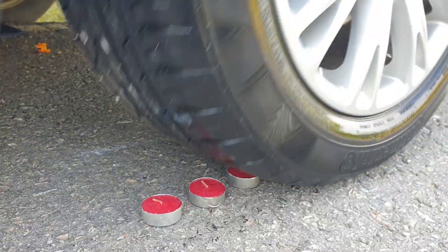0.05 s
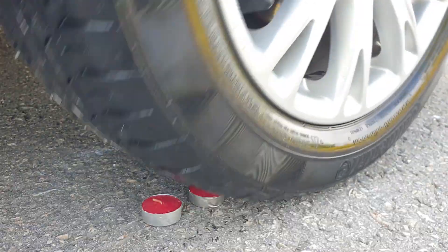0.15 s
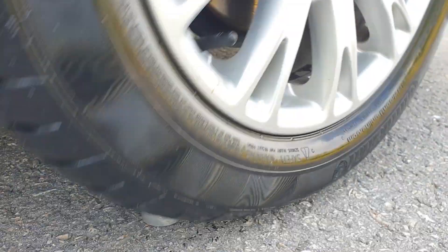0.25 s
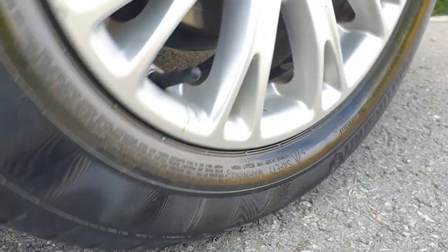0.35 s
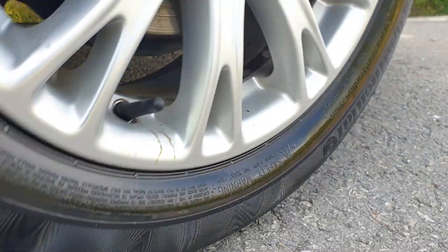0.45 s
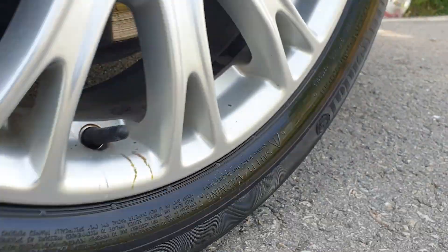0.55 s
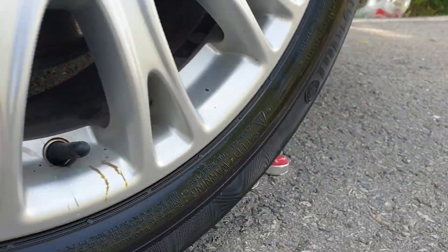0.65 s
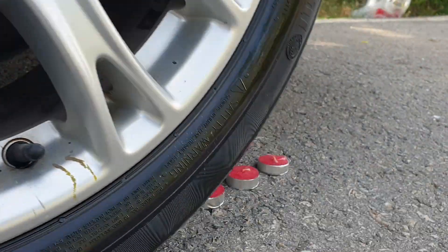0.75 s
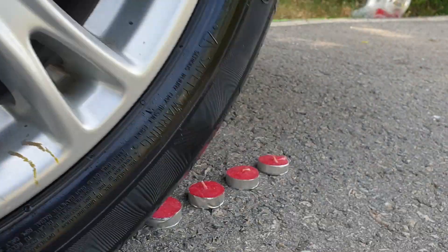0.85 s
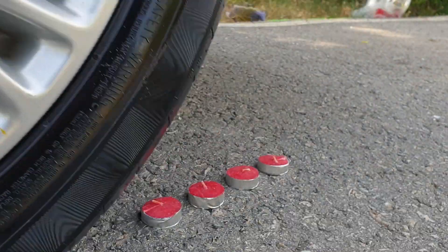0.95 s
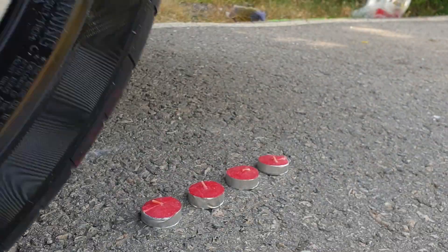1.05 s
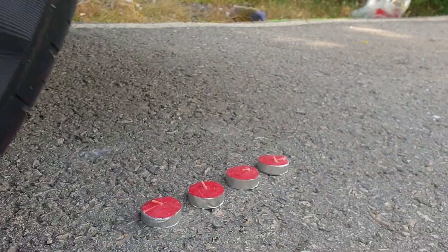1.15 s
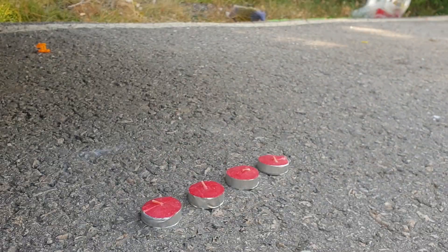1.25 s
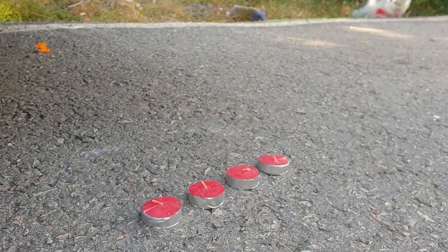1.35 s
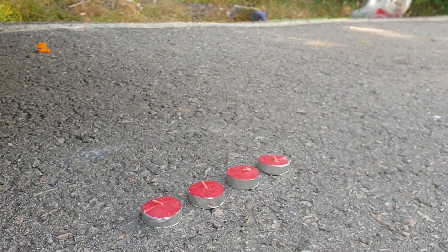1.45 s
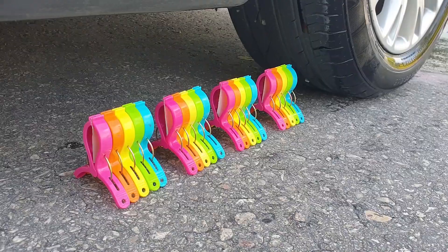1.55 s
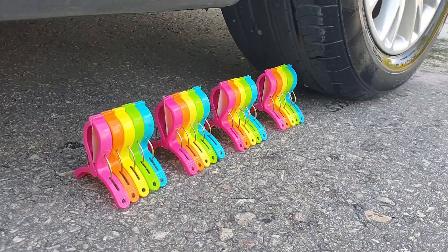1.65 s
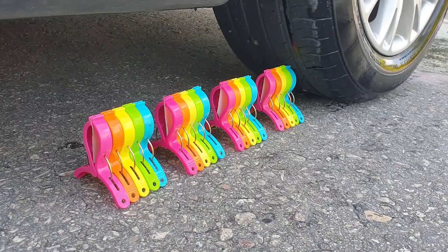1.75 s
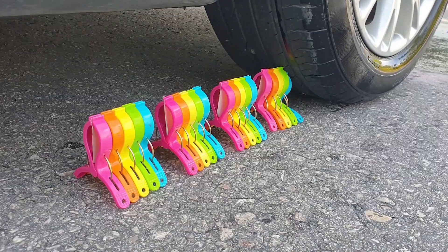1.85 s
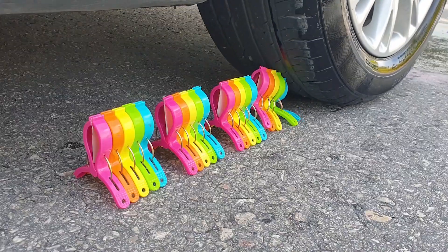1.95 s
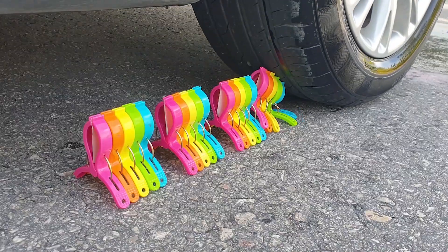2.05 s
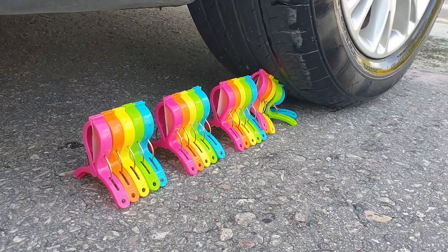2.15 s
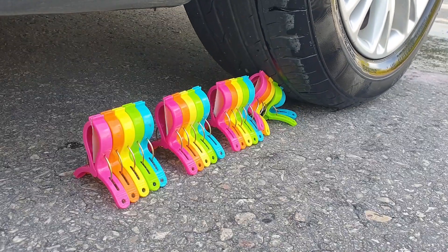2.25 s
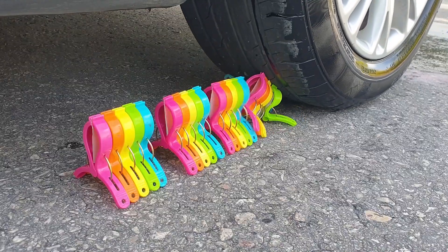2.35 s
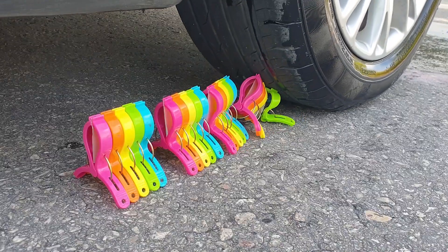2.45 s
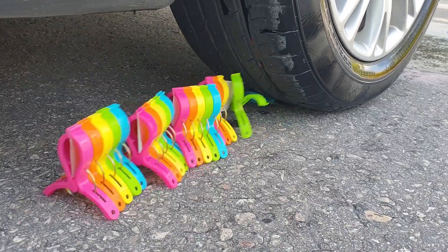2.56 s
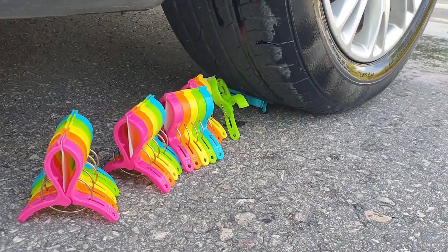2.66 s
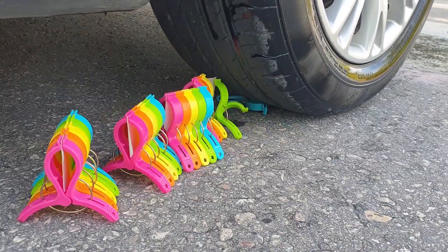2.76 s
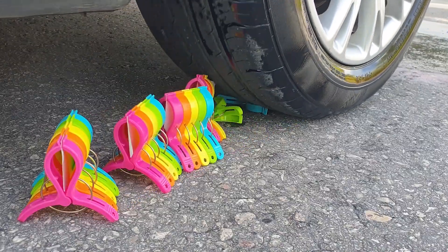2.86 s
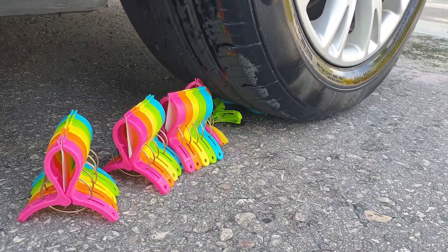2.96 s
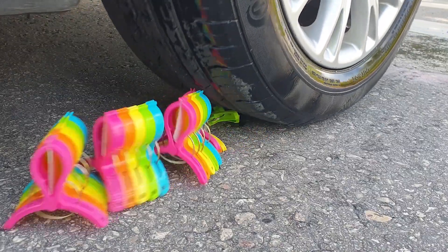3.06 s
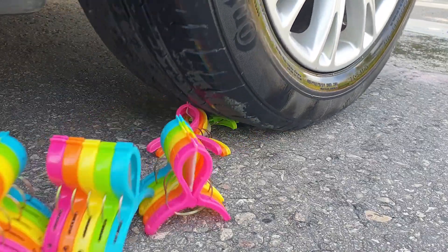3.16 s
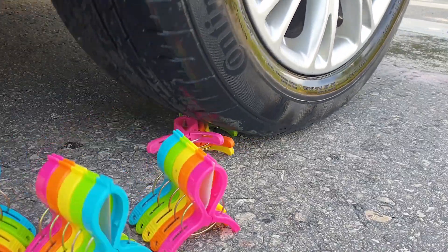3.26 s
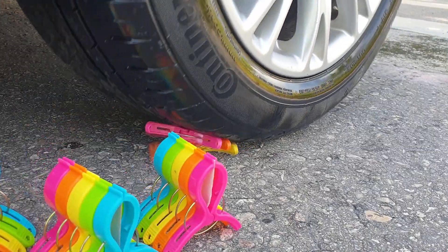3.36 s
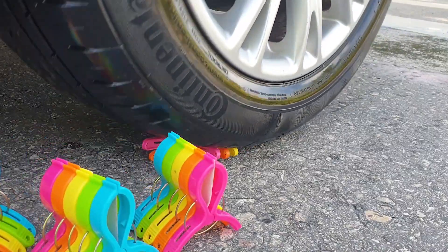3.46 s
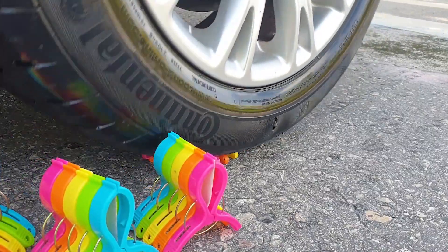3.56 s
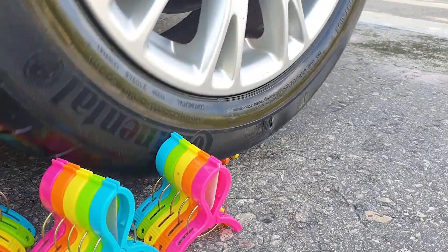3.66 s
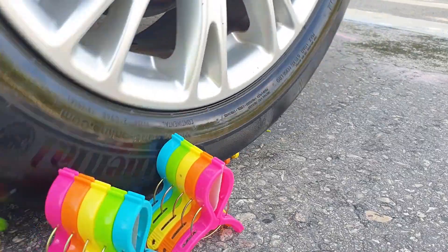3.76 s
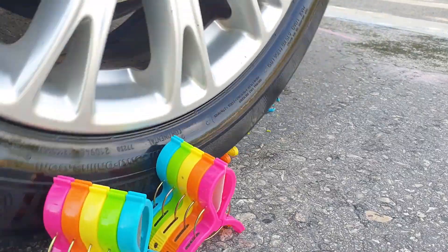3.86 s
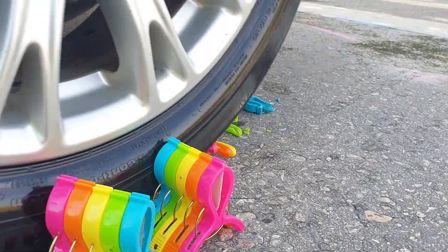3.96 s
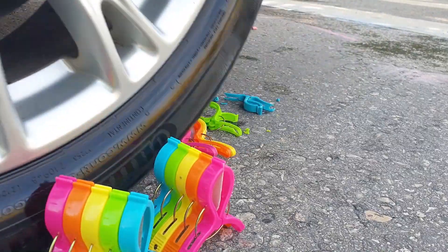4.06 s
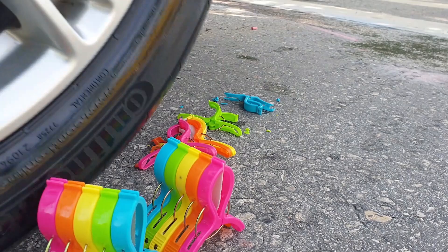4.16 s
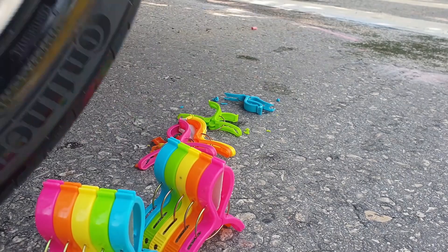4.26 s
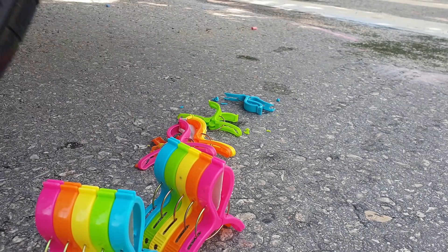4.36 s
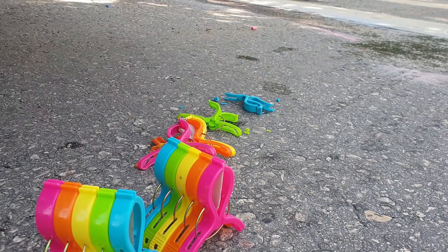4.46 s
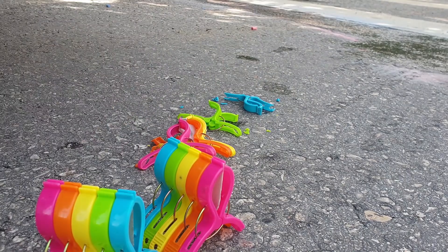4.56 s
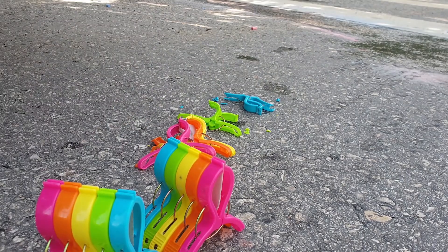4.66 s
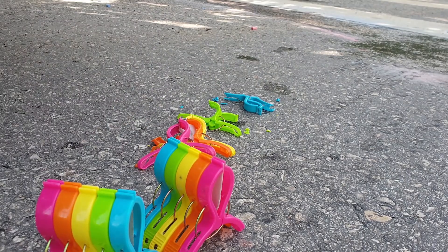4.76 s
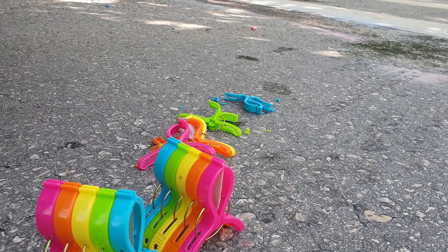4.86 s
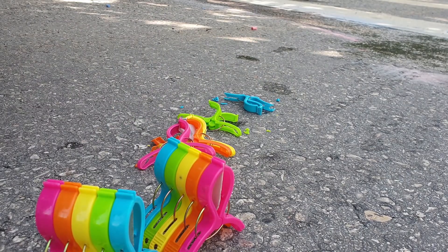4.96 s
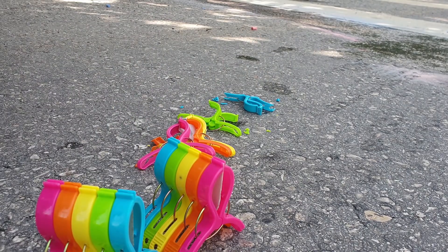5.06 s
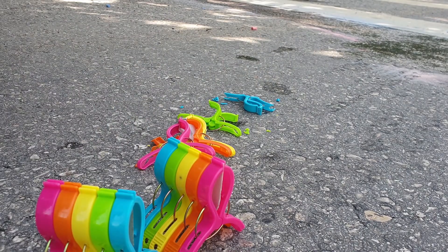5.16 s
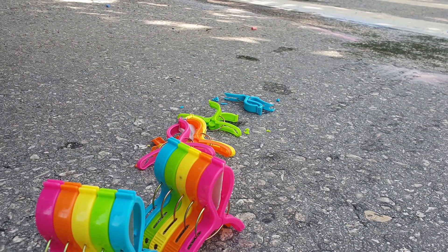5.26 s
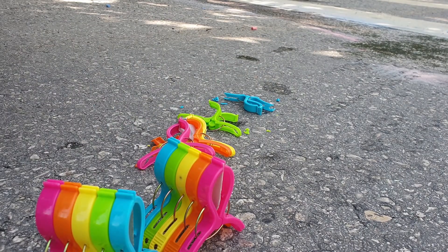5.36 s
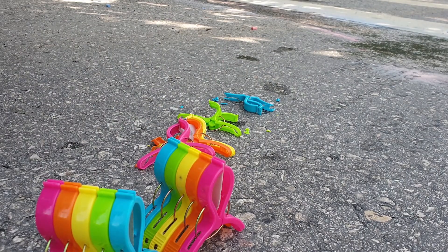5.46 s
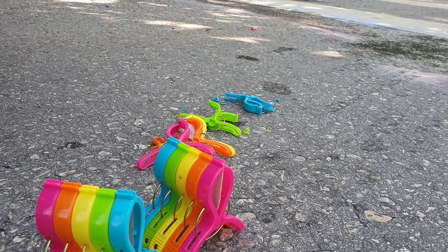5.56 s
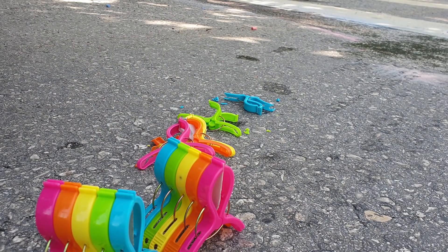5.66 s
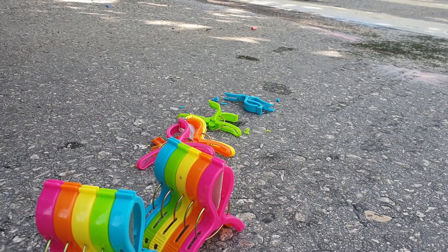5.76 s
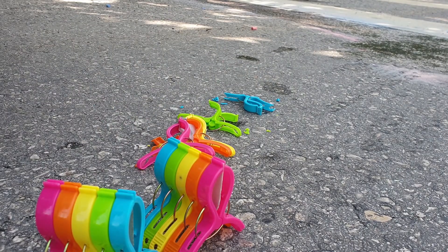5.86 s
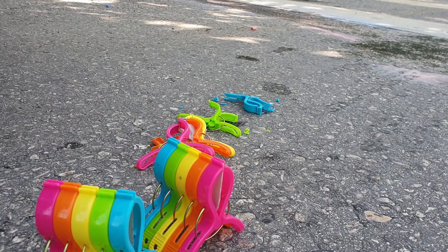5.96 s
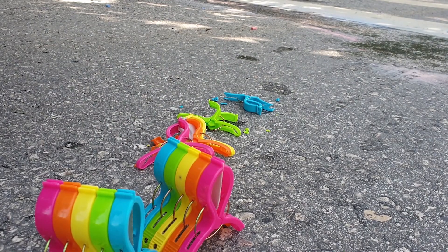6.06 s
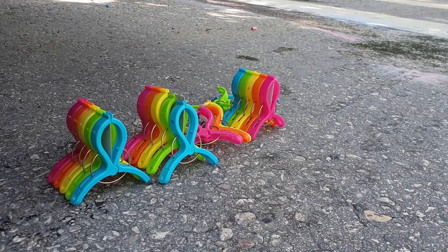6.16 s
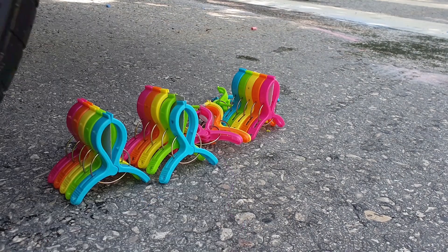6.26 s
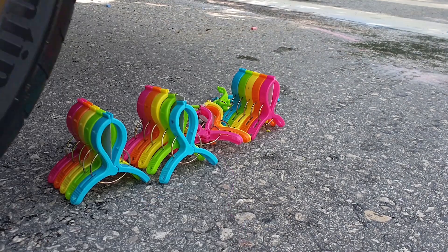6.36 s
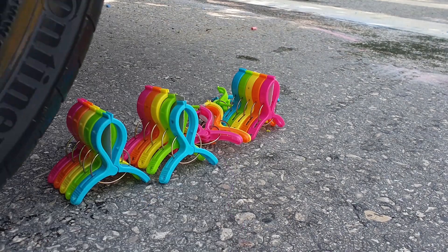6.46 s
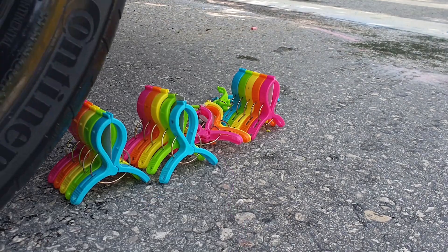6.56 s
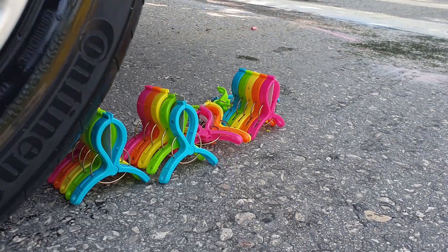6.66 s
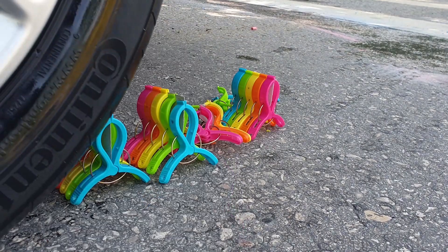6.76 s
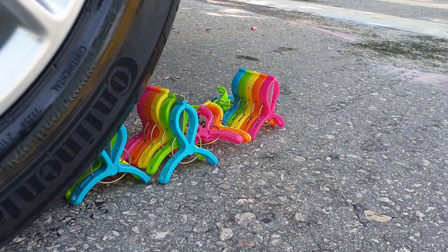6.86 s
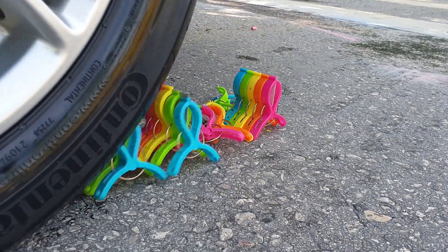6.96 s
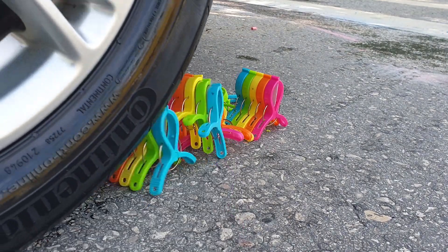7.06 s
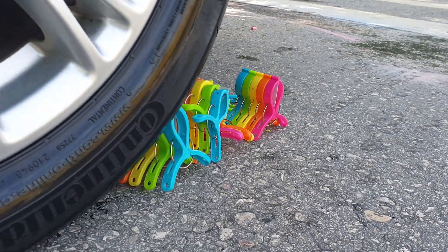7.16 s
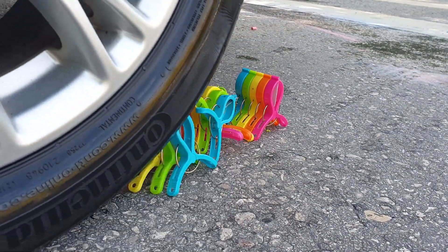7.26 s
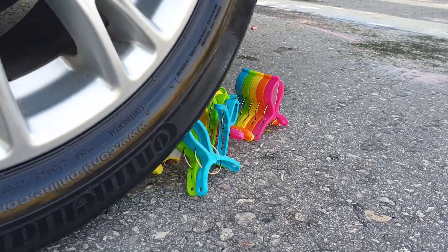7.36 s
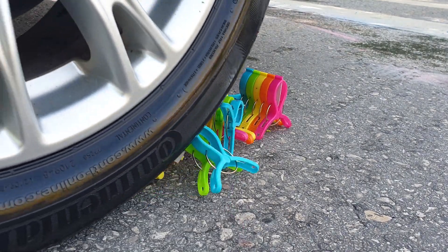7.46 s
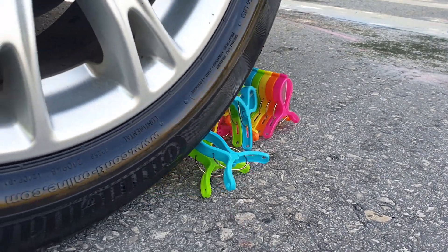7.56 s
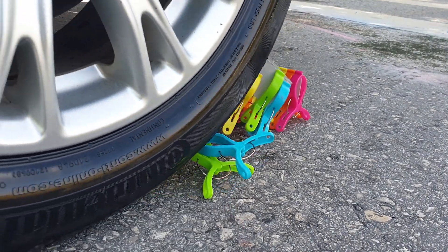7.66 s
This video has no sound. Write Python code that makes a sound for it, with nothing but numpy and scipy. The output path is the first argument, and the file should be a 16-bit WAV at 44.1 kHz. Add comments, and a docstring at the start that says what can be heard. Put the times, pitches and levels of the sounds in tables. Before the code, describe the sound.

Beside a low-humming car engine on asphalt, a rolling tyre breaks plastic clips with sharp dry snaps, crunches and dull ground thuds.

```python
"""A car engine hums, ticks and rushes beside a phone on the ground; plastic clips snap and crunch under its tyre.
It is heard in three passages, with a short silence before the last. The four-cylinder engine is a sum of
multiples of its crank speed, with resonant noise for the exhaust, valve ticks and rushing air.
Each hollow clip breaks as a click and a run of slips that excite resonances; dense grains make the crunch,
decaying sines the jolts of the ground, and small breaks on the left the bits that skitter away."""
import sys
import numpy as np
from scipy import signal
from scipy.fft import rfft, irfft
from scipy.io import wavfile
from scipy.ndimage import uniform_filter1d

SR = 44100
rng = np.random.default_rng(int(sys.argv[2]) if len(sys.argv) > 2 else 0)


def wav_record(signal):
    """Record a signal, one row per channel, as 16-bit PCM in the file named by sys.argv[1]."""
    frames = np.transpose(np.atleast_2d(signal))
    bounded = np.clip(frames, -1, 1)
    # unit amplitude maps onto the largest positive 16-bit level
    quanta = np.round(bounded * 32767).astype(np.int16)
    wavfile.write(sys.argv[1], SR, quanta)


N = 340011
T = np.arange(N) / SR

# The sounding passages. Each row: start in seconds, end in seconds.
PASSAGES = [(0, 1.602), (1.602, 6.171), (6.239, 7.72)]
PASSAGE = np.searchsorted([end for _, end in PASSAGES], T)  # index of the passage at each sample


def undb(db):
    """Decibel law: amplitude gain of a level."""
    return 10 ** (np.asarray(db) / 20)


def unit(x):
    """Normalisation to an rms of 1."""
    return x / np.sqrt(np.mean(x ** 2))


def ring(x, hz, width):
    """Simple resonance: two poles, gain 1 at the centre."""
    return signal.lfilter(*signal.iirpeak(hz, hz / width, SR), x)


def body(x, modes):
    """Modal superposition of doubled resonances; neighbours swing in opposite phase, which fills the gaps."""
    total = 0
    for k, (hz, width, db) in enumerate(modes):
        mode = ring(ring(x, hz, width), hz, width)
        total = total + (-1) ** k * undb(db) * mode
    return total


def band(x, lo_hz, hi_hz):
    """Band limitation by a Butterworth filter."""
    return signal.sosfilt(signal.butter(2, [lo_hz, hi_hz], "bandpass", fs=SR, output="sos"), x)


def walk(rate):
    """Random modulation: levels held 1 / rate s and smoothed twice, with a spread near 1."""
    k = int(SR / rate)
    held = np.repeat(rng.standard_normal(N // k + 1), k)
    return 1.34 * uniform_filter1d(uniform_filter1d(held, k), k)[:N]


def curves(tables):
    """Linear interpolation: columns of several tables joined on one time line."""
    s, *columns = np.transpose(np.concatenate(tables))
    return [np.interp(T, s, column) for column in columns]


def pan(x, db):
    """Level-difference stereo: left minus right in dB."""
    return x * undb(np.array([[db], [-db]]) / 2)


ENGINE_LEAD, ENGINE_PAN_DB = 20, 2.5  # samples by which the left port leads; left minus right in dB


def ports(alike):
    """Partial coherence: noise at two ports, partly shared; the left port hears the shared part first."""
    near = rng.standard_normal(N)
    pair = np.array([near, np.roll(near, ENGINE_LEAD)])
    return np.sqrt(alike) * pair + np.sqrt(1 - alike) * rng.standard_normal((2, N))


# Crank speed, one table a passage. Each row: time in seconds, crank speed in Hz.
CRANK = [
    [(0, 18.7), (0.24, 21), (0.45, 23), (0.654, 24.6), (1, 26.2), (1.33, 26.4), (1.6, 26.3)],
    [(1.602, 25), (1.92, 28.5), (2.01, 28.9), (2.31, 28.8), (2.58, 32.7), (2.76, 32.4), (3.06, 38.4),
     (3.25, 41.6), (3.48, 44.8), (3.86, 45.8), (4.11, 44.9), (4.4, 40.3), (4.9, 37.7), (5.2, 32),
     (5.81, 26.3), (6.17, 26.7)],
    [(6.24, 26.1), (7.71, 26.1)],
]


def crank_speed():
    """Rotation: the crank frequency that sets every engine pitch and tick."""
    return curves(CRANK)[0]


# Valve hiss as the engine bay comes and goes, one table a passage. Each row: time in seconds, level in dB.
NEAR = [
    [(0, -45), (.1, -47), (.5, -45.5), (.72, -47.5), (1.37, -53), (1.6, -54)],
    [(1.602, -53), (1.85, -50.5), (2.1, -59), (2.65, -53), (3.3, -46), (3.9, -54.5), (4.4, -62),
     (4.83, -65.5), (6.17, -67.3)],
    [(6.24, -57), (7.71, -54)],
]
# The rush at the reference hiss. Each row, one a passage: rumble in dB, drone in dB, clatter in dB.
RUSH_DB = [(-48, -49, -52), (-46, -51.5, -53), (-44, -45, -54)]
HISS_REF_DB = -55
# dB that rumble, drone and clatter, in this order, follow for each dB of hiss.
RUSH_SLOPE = [0.54, 0.072, 0.78]


def rush_levels():
    """Common level variation: rumble, drone and clatter follow the hiss, each by its own slope."""
    hiss_db = curves(NEAR)[0]
    following = np.outer(RUSH_SLOPE, hiss_db - HISS_REF_DB)
    return [*(np.transpose(RUSH_DB)[:, PASSAGE] + following), hiss_db]


# Engine load, one table a passage. Each row: time in seconds, hum level in dB before order weight and pipe,
# lift of the upper orders in dB per octave.
LOAD = [
    [(0, -40, 0), (0.15, -42.5, -2.4), (0.45, -39.5, -3), (1, -48, 3), (1.6, -53.5, 7.5)],
    [(1.602, -39.5, -2.4), (1.95, -39.5, 0.1), (2.1, -44.2, -3.5), (2.6, -42.5, -0.7), (3.1, -42.5, -7.5),
     (3.6, -46.5, 1.1), (4.2, -49.5, -11.5), (4.9, -59.5, -0.5), (5.4, -59, 1), (6.17, -55.5, 1)],
    [(6.24, -49, 2.2), (6.7, -46, 0.3), (7.1, -50, 2.9), (7.71, -54, 7)],
]
# Main orders, as multiples of the crank speed.
ORDERS = [1, 2, 3, 4, 5, 6, 8, 9]
# Weight of each main order. Each row: dB in the first passage, dB in the later passages.
ORDER_DB = [(-7, -2), (12, 6), (-9, 1.5), (8, -0.5), (-12, 1), (7, -0.5), (2, -13), (-1, -7.5)]
# Transmission of the exhaust. Each row: frequency in Hz, gain in dB.
PIPE = [(25, -19), (45, -13), (52, 4.0), (75, 10.3), (90, 5.5), (110, 4), (138, 4.0), (150, -3.5),
        (185, -3.0), (205, -2.5), (222, -5.5), (236, 2), (260, -1), (400, -7)]


def order_levels(crank_hz):
    """Source and filter: each order takes the load, its own weight and the pipe gain at its pitch."""
    level_db, lift_db = curves(LOAD)
    pipe_hz, pipe_db = np.transpose(PIPE)
    levels = []
    for k, (first_db, later_db) in zip(ORDERS, ORDER_DB):
        weight_db = np.where(PASSAGE == 0, first_db, later_db)
        passed_db = np.interp(np.log(k * crank_hz), np.log(pipe_hz), pipe_db)
        levels.append((k, level_db + lift_db * np.log2(k / 2) + weight_db + passed_db))
    return levels


# Faint orders. Each row: multiple of the crank speed, dB against the rumble before the passage offset.
FAINT_ORDERS = [(7, -10), (10, -12), (12, -7), (18, -9), (22, -6), (24, -8), (26, -9), (28, -8)]
# Passage offset of the faint orders in dB: they show mostly with the engine beside the phone.
FAINT_DB = [0, -12, -10]


def hum(turns, levels):
    """Harmonic synthesis: crank orders, each wavering a little with uneven firing."""
    rumble_db = rush_levels()[0]
    faint = [(k, rumble_db + db + np.take(FAINT_DB, PASSAGE)) for k, db in FAINT_ORDERS]
    tone = 0
    for k, db in levels + faint:
        amplitude = np.sqrt(2) * undb(db + 1.5 * walk(14))
        tone = tone + amplitude * np.sin(2 * np.pi * (k * turns + rng.random()) + .15 * walk(10))
    # air moving at the ports, in opposite phase
    apart = unit(band(rng.standard_normal(N), 35, 70)) * undb(rumble_db - 14)
    return np.array([tone + apart, np.roll(tone, ENGINE_LEAD) - apart])


# Valve ticks, one row a passage. Each row: crank phase of the tick from 0 to 1, share of the tick half a turn
# later, dB over the steady noise before distance and speed blur it.
TICKS = [(.3, .85, -4), (.04, .3, 5), (.06, .35, 7)]
IDLE_HZ, TICK_BLUR_DB_PER_HZ = 27, .6  # above idle the ticks run together


def valve_ticks(turns, hiss_db):
    """Cyclic impacts: two pulses a crank turn; returns their envelope, level and running number."""
    start, second, tick_db = np.transpose(TICKS)[:, PASSAGE]
    tick_db = tick_db - np.clip(.5 * (-54 - hiss_db), 0, 4)  # from afar the ticks blur into the hiss
    tick_db = tick_db - TICK_BLUR_DB_PER_HZ * np.maximum(crank_speed() - IDLE_HZ, 0)
    phase = turns - np.interp([s for s, _ in PASSAGES], T, turns)[PASSAGE] - start
    number = (2 * (phase + 1 + 200 * PASSAGE)).astype(int)
    first_pulse = np.exp(-((phase % 1) / .33) ** 2)
    second_pulse = np.exp(-(((phase + .5) % 1) / .3) ** 2)
    return uniform_filter1d(first_pulse + second * second_pulse, size=150), tick_db, number


# Low and high resonances of a valve tick. Each row: centre in Hz, width in Hz, relative level in dB.
TICK_LOW = [(2600, 700, -2), (4000, 450, -2)]
TICK_HIGH = [(6800, 900, -7), (9800, 1400, -5), (11500, 1300, -1), (12900, 1300, 0), (14300, 1200, -4)]


def tick_ring(tick, number, modes):
    """Impact excitation: every tick rings each resonance with its own strength."""
    total = 0
    for mode in modes:
        strength = undb(2.2 * rng.standard_normal(N // 200))[number]
        total = total + body(ports(.5) * tick * strength, [mode])
    return unit(total)


# Exhaust rumble spectrum. Each row: frequency in Hz, relative density in dB.
RUMBLE = [(15, -35), (25, 2.5), (102, -4.5), (142, -9), (194, -13), (254, -16), (348, -14.5), (462, -17),
          (750, -15.5), (980, -35.5), (1650, -120)]
# Resonances of drone, clatter and hiss. Each row: centre in Hz, width in Hz, relative level in dB.
DRONE = [(860, 300, -1), (1000, 260, 0), (1150, 200, -6)]
CLATTER = [(1270, 640, -4), (1910, 1380, -1.5), (2700, 3040, -4.5), (3480, 2960, -2.5)]
HISS = [(6650, 15600, -2.5), (9760, 4200, 4.5), (13100, 2400, -0.5)]


def rush(turns):
    """Spectral shaping of noise: exhaust rumble and drone, clatter and hiss, with valve ticks on top."""
    rumble_db, drone_db, clatter_db, hiss_db = rush_levels()
    tick, tick_db, number = valve_ticks(turns, hiss_db)
    low, high = [tick_ring(tick, number, modes) for modes in (TICK_LOW, TICK_HIGH)]
    hz = np.maximum(np.fft.rfftfreq(N, 1 / SR), 1)
    rumble_hz, density_db = np.transpose(RUMBLE)
    shape = undb(np.interp(np.log(hz), np.log(rumble_hz), density_db))
    rumble = irfft(rfft(ports(0.86)) * shape, N)
    rumble = rumble / np.std(band(rumble, 250, 700)) * (.9 + .3 * tick)
    drone = unit(body(ports(0.41) * (1.9 + tick), DRONE))
    clatter = unit(body(ports(.4), CLATTER)) + undb(tick_db - 4) * low
    hiss = unit(body(ports(0.084), HISS)) + undb(tick_db) * high
    return (undb(rumble_db + 1.14 * walk(9.1)) * rumble + undb(drone_db + walk(20)) * drone
            + undb(clatter_db) * clatter + undb(hiss_db) * hiss)


def engine():
    """Periodic and random source together: hum and rush, a little stronger on the left."""
    crank_hz = crank_speed()
    turns = np.cumsum(crank_hz) / SR
    return pan(hum(turns, order_levels(crank_hz)) + rush(turns), ENGINE_PAN_DB)


def add(out, x, s):
    """Superposition: mix a short sound in at a time."""
    i = int(s * SR)
    out[:, i:i + x.shape[1]] += x[:, :N - i]


def peak(x, db):
    """Short-time level: scaled so that the loudest 3 ms have this level."""
    return x * undb(db) / np.sqrt(uniform_filter1d(np.mean(x ** 2, axis=0), size=130).max())


def crack(t60, rise, spike, alike):
    """Stick-slip fracture: an optional click, then slips that die away; the left port hears it first."""
    t = np.arange(int(.12 * SR)) / SR
    t60, rise = max(t60, .008), max(rise, .0001)
    slips = undb(4 * rng.standard_normal(len(t) // 40 + 1)).repeat(40)[:len(t)]
    shared = rng.standard_normal(len(t))
    noise = np.sqrt(alike) * shared + np.sqrt(1 - alike) * rng.standard_normal((2, len(t)))
    decay = undb(-60 * t / t60) + 0.071 * undb(-60 * t / 0.24)  # fast decay and a faint longer tail
    x = noise * slips * decay * (1 - np.exp(-t / rise)) ** 2
    x[:, :3] += spike * np.array([1, -.6, -.4])
    return np.array([x[0], np.roll(x[1], rng.integers(1, 8))])


DEBRIS_PAN_DB = 4  # knocks, tears and crunch: left minus right

# Dull knocks and soft scuffs. Each row: start in seconds, knock level in dB, knock pitch in Hz,
# scuff level in dB, t60 of the fast decay in seconds, rise time constant in seconds.
KNOCKS = [(0.458, -30.5, 790, -54, 0.06, 0.0033), (0.869, -38, 740, -61, 0.035, 0.0022),
          (2.796, -28.5, 1360, -49, 0.024, 0.00066), (3.481, -14, 920, -68, 0.043, 0.0033),
          (3.613, -21.5, 745, -34, 0.051, 0.0015), (3.753, -24, 600, -35.5, 0.027, 0.0031),
          (4.803, -57, 321, -42, 0.13, 0.0058), (4.979, -40.5, 313, -55, 0.029, 0.0048),
          (5.757, -42.5, 358, -60, 0.06, 0.0035)]


def knocks():
    """Damped resonance: a soft blow rings one broad mode, with a scuff of mid-band noise."""
    out = np.zeros((2, N))
    for s, db, hz, scuff_db, t60, rise in KNOCKS:
        x = crack(t60, rise, 0, 1.0)
        knock = peak(ring(x, hz, 0.43 * hz), db)
        scuff = peak(band(x, 1200, 2600), scuff_db)
        add(out, pan(knock + scuff, DEBRIS_PAN_DB), s)
    return out


# Broad colour of the plastic. Each row: centre in Hz, width in Hz, relative level in dB.
SHARD = [(5770, 6900, -1), (8500, 6900, 5.5), (11650, 7750, 3.5)]


def shards(x):
    """Modal ringing: the broad colour of the plastic plus short rings of this break's own pieces."""
    own = sum(ring(x, hz, 0.067 * hz) for hz in 2000 * 7 ** rng.random(size=6))
    return body(x, SHARD) + own


# Plastic snaps under the tyre. Each row: start in seconds, treble level in dB, t60 of the fast decay in seconds,
# middle in dB against the treble, knock level in dB, knock pitch in Hz.
SNAPS = [(0.4835, -40.5, 0.063, 7, -24.5, 540), (1.8205, -36, .046, -4, -37, 900),
         (1.839, -33, 0.21, -4, -42, 509), (1.8665, -36, .042, -10, -26, 401),
         (1.8743, -21, 0.024, -3.5, -40, 1670), (1.8853, -37, .05, -13, -27, 450),
         (1.934, -15, 0.03, -10, -26, 820), (1.951, -18.5, 0.042, -6, -27, 460),
         (1.965, -20.5, 0.053, -15, -42, 452), (1.98, -24, .063, -20, -31, 420),
         (1.9999, -14.5, 0.088, -42, -26.5, 433), (2.0452, -34, .056, -8, -37, 665),
         (2.0777, -35, .05, -21, -32, 1370), (2.0822, -11.5, 0.02, -30, -32, 1620),
         (2.104, -37, .035, -11, -34, 1650), (2.155, -35, 0.082, -0.5, -34.5, 1710),
         (2.1954, -33, 0.091, -13, -40, 398), (2.2324, -21.5, 0.028, -35, -36, 1210),
         (2.2543, -30, 0.058, -14, -42, 697), (2.3192, -26.5, 0.039, -3.5, -40, 400),
         (2.37, -38, .04, -5, -41, 412), (2.4044, -6, 0.054, -16, -17.5, 1710),
         (2.4122, -15.5, 0.056, -14, -20.5, 1230), (2.4826, -29.5, .027, -9, -33.5, 860),
         (2.502, -38, .05, -15, -37, 401), (2.5476, -11, 0.16, -24, -25.5, 1170),
         (2.7669, -12.5, .022, -37, -30, 1050), (2.8325, -15.5, 0.076, -30, -11, 900),
         (2.866, -36, .027, 5, -35, 1040), (2.8875, -19, 0.031, -1.5, -37, 1800),
         (2.917, -39.5, .027, 8, -41, 471), (3.1022, -11.5, 0.039, -32, -26, 400),
         (3.1106, -10, .033, -35, -24, 1700), (3.1275, -12, .039, -24, -8.5, 820),
         (3.1408, -35, .05, -6.5, -14.5, 840), (3.1607, -25.5, 0.11, -11, -45, 595),
         (3.211, -12, 0.016, -3.5, -14, 890), (3.306, -25.5, 0.023, -3, -42, 436),
         (3.3423, -28.5, 0.037, 0.5, -41, 514), (3.3934, -12, 0.051, -10.5, -24, 824),
         (3.43, -7.5, 0.03, -3, -13, 610), (3.463, -19, 0.023, -22, -10.5, 725),
         (3.4833, -15, 0.12, -27, -8, 894), (3.578, -26, 0.051, -4, -48, 490),
         (3.6148, -11, 0.038, -20, -12, 724), (3.652, -22, 0.028, -9, -20, 1010),
         (3.7549, -16, 0.12, -28, -15.5, 615), (3.8037, -29.5, 0.13, -7, -35, 470),
         (3.8236, -13.5, 0.052, -23, -15, 880), (6.969, -34, 0.035, -17, -46, 633),
         (6.986, -28.5, .05, -29.5, -40, 398), (6.9949, -10, 0.037, -37, -28.5, 890),
         (7.031, -3, .048, -38, -19, 850), (7.089, -33, .045, -25, -50, 638),
         (7.1254, -28.5, 0.094, -28, -54, 646), (7.215, -25.5, 0.044, -14, -34, 790),
         (7.238, -20, 0.056, -19, -27, 830), (7.256, -17.5, 0.025, -10, -28.5, 845),
         (7.308, -18, 0.11, -26, -28, 870), (7.3183, -14.5, 0.033, -15, -23.5, 740),
         (7.3446, -32, .073, -14, -28, 980), (7.3672, -9, 0.03, -14.5, -42, 573),
         (7.3955, -22, 0.057, -15, -27, 1000), (7.437, -13.5, 0.026, -6, -19.5, 755),
         (7.4639, -14, 0.074, -10, -23.5, 1570), (7.505, -28, .032, -19, -27, 840),
         (7.5238, -7, 0.021, -17, -21, 1010), (7.5446, -12, 0.055, -39, -37, 744),
         (7.611, -16.5, .05, -14, -25, 1600), (7.6283, -9, 0.024, -33, -27, 762),
         (7.668, -5, 0.026, -8, -17.5, 1230), (7.6834, -11, 0.049, -31, -21, 1280),
         (7.6987, -22, .058, -20, -30, 533)]
SNAP_PAN_DB, SNAP_SCATTER_DB = 5, 2  # left minus right, and its spread from snap to snap
SPIKE = 10.  # height of the first click against the slips that follow


def snaps():
    """Brittle fracture: each break rings the shards and knocks the hollow clip."""
    out = np.zeros((2, N))
    for s, db, t60, middle_db, knock_db, hz in SNAPS:
        pan_db = SNAP_PAN_DB + SNAP_SCATTER_DB * rng.standard_normal()
        x = crack(t60, 0.000093, SPIKE, 0.45)
        blow = crack(0.088, 0.00088, 0, 1.0)
        blow[:, :12] += 9.0 * np.hanning(12)  # the wall gives way in one short push
        knock = ring(blow, hz, .8 * hz) + 1.3 * ring(blow, hz, .1 * hz)
        knock = knock + .5 * ring(blow, 1.45 * hz, .1 * hz)
        treble = peak(shards(x), db)
        middle = peak(band(x, 1400, 4730), db + middle_db)
        add(out, pan(treble + middle + peak(knock, knock_db), pan_db), s)
    return out


# Dense crunch while the tread grinds the plastic. Each row: start in seconds, length in seconds,
# treble level in dB, middle level in dB (both before panning).
CRUNCH = [(1.805, 0.24, -59, -37.5), (2.033, 0.12, -47, -45.5), (2.408, 0.31, -54, -51.5),
          (3.069, 0.26, -43.5, -41.5), (3.4, .31, -57, -51), (3.884, .4, -56, -56.5),
          (6.968, 0.11, -55, -36), (7.214, .24, -58, -38.5), (7.492, 0.32, -42, -41)]
CRUNCH_EDGE_S, CRUNCH_BODY_DB = 0.029, -0.5  # fade of each spell; hollow low body against the middle


def crunch():
    """Granular noise: many tiny fractures of very uneven size, each smeared over a few ms."""
    spells = np.array([np.clip(np.minimum(T - s, s + length - T) / CRUNCH_EDGE_S, 0, 1)
                       for s, length, _, _ in CRUNCH])
    treble, middle = undb(np.array(CRUNCH)[:, 2:]).T @ spells
    sizes = undb(np.minimum(4.5 * rng.exponential(size=N), 13))
    grains = (rng.random(N) < 500 / SR) * sizes  # 500 a second on average
    smear = signal.lfilter([1], [1, -np.exp(-1 / (0.0017 * SR))], grains)
    x = smear * (.5 * rng.standard_normal(N) + 0.74 * rng.standard_normal((2, N)))
    sound = treble * unit(body(x, SHARD)) + middle * unit(band(x, 600, 5100))
    sound = sound + middle * undb(CRUNCH_BODY_DB) * unit(band(x.sum(axis=0), 162, 610))
    return pan(sound, DEBRIS_PAN_DB)


# Slower tearing. Each row: start in seconds, treble level in dB, t60 of the fast decay in seconds,
# rise time constant in seconds.
TEARS = [(1.861, -39, 0.05, 0.008), (3.105, -13, 0.071, 0.0032), (7.011, -18.5, 0.092, 0.0088),
         (7.355, -21.5, .05, 0.0066), (7.662, -15, .06, .004)]


def tears():
    """Gradual fracture: slips without a click that swell before they die."""
    out = np.zeros((2, N))
    for s, db, t60, rise in TEARS:
        add(out, pan(peak(shards(crack(t60, rise, 0, 0.96)), db), DEBRIS_PAN_DB), s)
    return out


# The tyre drops and jolts the ground. Each row: start in seconds, deep level in dB, thud level in dB,
# thud pitch in Hz.
JOLTS = [(1.867, -34, -31, 187), (1.95, -38, -26, 130), (1.994, -13, -40, 118), (2.548, -18, -39, 162),
         (2.82, -28, -32, 119), (3.131, -42, -18.5, 300), (3.427, -35, -27.5, 184), (3.48, -20, -33, 124),
         (3.616, -12.5, -34, 115), (3.757, -14.5, -25, 113), (3.819, -41, -22.5, 236),
         (4.982, -49, -33, 171), (6.999, -35, -26, 127), (7.029, -36, -26.5, 247), (7.241, -26, -23.5, 122),
         (7.319, -44, -26, 229), (7.371, -32, -23, 121), (7.437, -35, -25, 119), (7.522, -44, -19.5, 122),
         (7.609, -29, -31, 123), (7.669, -47, -24.5, 234)]


def jolts():
    """Damped oscillation: one deep swing and a short hollow thud."""
    out, t = np.zeros((2, N)), np.arange(4000) / SR * np.ones((2, 1))
    for s, deep_db, thud_db, hz in JOLTS:
        deep = np.sin(2 * np.pi * 38 * t) * np.exp(-t / 0.004)
        thud = np.sin(2 * np.pi * hz * t) * np.exp(-t / 0.012)
        add(out, peak(deep, deep_db) + peak(thud, thud_db), s)
    return out


# Loose bits skittering off to the left. Each row: start in seconds, treble level in dB,
# middle in dB against the treble.
SKITTERS = [(3.8932, -37.5, 0.5), (3.952, -37.5, 0.5), (3.9695, -25.5, -7), (3.994, -32.5, -3),
            (4.1484, -42.5, -5), (4.224, -44, -1), (4.2748, -31, -11), (4.298, -52, 1.5), (4.438, -41, -23)]
SKITTER_T60_S, SKITTER_PAN_DB = 0.085, 10  # fast decay; left minus right


def skitters():
    """Repeated impact: each hop is a small crack that rings the plastic."""
    out = np.zeros((2, N))
    for s, db, middle_db in SKITTERS:
        x = crack(SKITTER_T60_S, 0.000093, SPIKE, 0.58)
        sound = peak(shards(x), db) + peak(band(x, 2000, 4960), db + middle_db)
        add(out, pan(sound, SKITTER_PAN_DB), s)
    return out


def scene():
    """Superposition of engine, plastic and ground."""
    return engine() + knocks() + snaps() + crunch() + tears() + jolts() + skitters()


def follow(x, attack_s, release_s, size=32):
    """Envelope detection: separate time constants for rise and fall, updated block by block."""
    out, level = [], 0.
    for v in uniform_filter1d(x, size=size)[::size].tolist():
        level += (v - level) * min(size / SR / (attack_s if v > level else release_s), 1)
        out.append(level)
    return np.interp(T, T[::size], out)


# gain control of the phone
DUCK_FROM_DB, DUCK_RATIO, DUCK_ATTACK_S, DUCK_RELEASE_S = -16, 1.5, 0.0087, 0.24
TOP_HZ = 15700


def record(dry):
    """Compression and band limits: gated passages, bass roll-off, ducking, rounded peaks, a steep top cut."""
    on = sum((T >= start) & (T < end) for start, end in PASSAGES)
    cut = signal.sosfilt(signal.butter(3, 33, "highpass", fs=SR, output="sos"), dry)
    cut = cut * uniform_filter1d(1. * on, size=60)
    loud = follow(np.abs(cut).max(axis=0), DUCK_ATTACK_S, DUCK_RELEASE_S)
    cut = cut * np.maximum(loud / undb(DUCK_FROM_DB), 1) ** (1 / DUCK_RATIO - 1)
    rounded = np.tanh(1.167 * cut) / 1.114
    return signal.sosfilt(signal.ellip(7, .5, 75, TOP_HZ, fs=SR, output="sos"), rounded)


dry = scene()
out = record(dry)
wav_record(out)
```